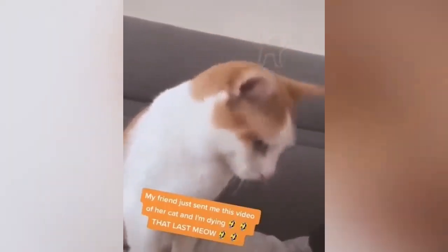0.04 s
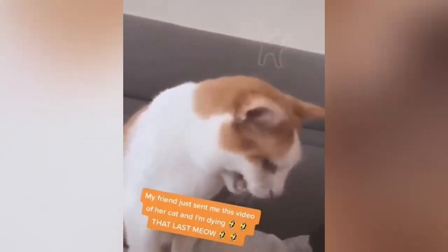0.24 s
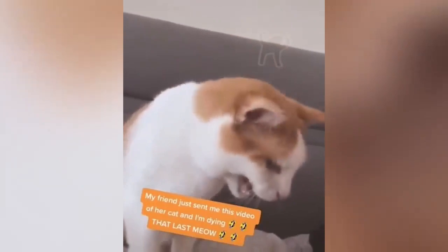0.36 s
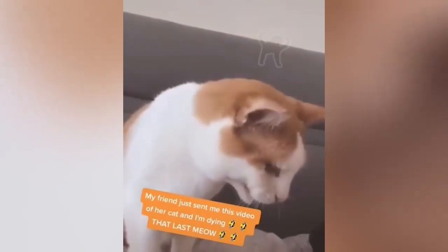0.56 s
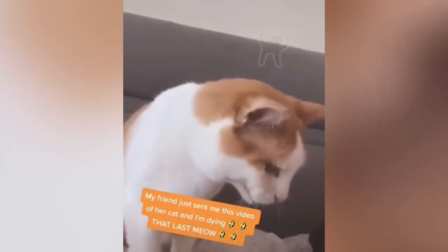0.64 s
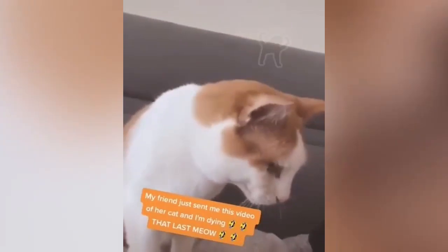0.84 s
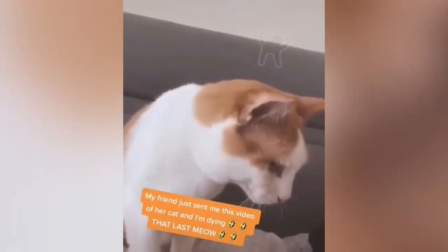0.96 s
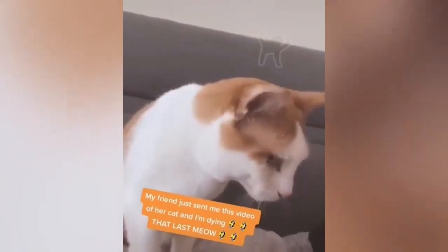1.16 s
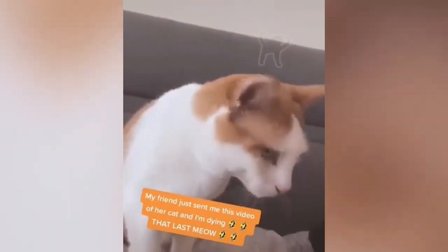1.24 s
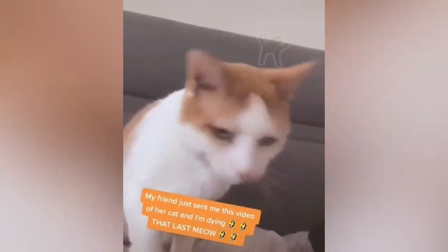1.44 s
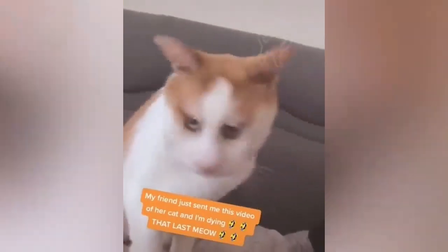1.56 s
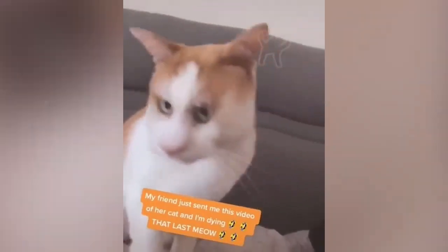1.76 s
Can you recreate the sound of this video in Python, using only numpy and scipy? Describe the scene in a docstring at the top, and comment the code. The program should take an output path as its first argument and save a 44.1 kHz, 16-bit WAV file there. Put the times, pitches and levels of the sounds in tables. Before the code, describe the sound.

Single close cat meow, bright then narrowing to a closed mouth, over faint indoor hum and rustle.

```python
"""A quiet furnished room, where a house cat gives one long, clear meow close to the microphone.
The voice is a stack of harmonics plus pulsing breath noise, shaped by throat and mouth resonances.
The mouth opens wide and slowly narrows, so the resonances sink, until the lips shut with a small
smack of two ringing tones. Ticks are resonant noise bursts and rustles are grainy noise; beneath
them lie a hum of wavering sines and the filtered noise of rumble and hiss."""
import sys
import numpy as np
from scipy import signal
from scipy.fft import rfft, irfft, next_fast_len
from scipy.io import wavfile
from scipy.ndimage import map_coordinates

SR = 44100
rng = np.random.default_rng(int(sys.argv[2]) if len(sys.argv) > 2 else 0)


def put_to_file(sound):
    """Save the sound as 16-bit audio at rate SR, in the file named by the first command-line argument."""
    columns = np.atleast_2d(sound).T  # one column per channel
    safe = np.clip(columns, -1, 1)
    whole_steps = np.round(safe * 32767)
    wavfile.write(sys.argv[1], SR, whole_steps.astype(np.int16))


N = 79380


def amp(db):
    """Decibels to gain."""
    return 10 ** (np.asarray(db) / 20)


def unit(x):
    """Scale to rms 1."""
    return x / np.sqrt(np.mean(x ** 2) + 1e-20)


def curves(rows, t):
    """Read each column after the time at times t, with straight lines between rows."""
    times, *columns = np.transpose(rows)
    return [np.interp(t, times, column) for column in columns]


def wobble(rate):
    """A smooth random curve through `rate` random knots a second."""
    knots = rng.standard_normal(N // 8)
    return map_coordinates(knots, [np.arange(N) * rate / SR + 4])


def filtered(x, response):
    """Pass x through a response given as a function of frequency."""
    m = next_fast_len(N + SR // 2)  # padded so that ringing does not wrap round
    return irfft(rfft(x, m) * response(np.fft.rfftfreq(m, 1 / SR)), m)[:N]


def noise(colour):
    """Noise of rms 1 whose spectrum follows a colour table on a log-frequency axis."""
    hz, db = np.transpose(colour)

    def response(f):
        return amp(np.interp(np.log(f + 1), np.log(hz + 1), db))

    return unit(filtered(rng.standard_normal(N), response))


def decay(age, t60):
    """Exponential decay that falls 60 dB in t60 seconds."""
    return np.exp(-np.log(1000) * age / t60)


# electrical hum partials: f/Hz, level/dB (rms)
HUM_PARTIALS = [(49.7, -43.5), (99.8, -57), (247, -63.5), (691, -71)]
HUM_WAVER_DB, HUM_WAVER_RAD = 0.5, 0.5


def hum(t, wavers_per_s=8):
    """Steady electrical partials, each wavering a little in level and phase."""
    out = np.zeros(N)
    for hz, db in HUM_PARTIALS:
        level = amp(db + HUM_WAVER_DB * wobble(wavers_per_s))
        phase = 2 * np.pi * hz * t + HUM_WAVER_RAD * wobble(wavers_per_s)
        out += level * np.sqrt(2) * np.sin(phase)
    return out


# spectrum of the room rumble: f/Hz, level/dB (relative)
RUMBLE_COLOUR = [(28, -29), (45, -6.5), (60, 5), (78, -15.5), (110, -12), (180, -13.5), (220, -23),
                 (320, -22), (560, -26.5), (2900, -36), (8400, -52), (12000, -68)]
RUMBLE_DB = -46  # rms


def rumble():
    """Low room tone: noise weighted heavily to the bass."""
    return amp(RUMBLE_DB) * noise(RUMBLE_COLOUR)


# spectrum of the hiss: f/Hz, level/dB (relative)
HISS_SPECTRUM = [(200, 9), (600, -5.5), (3000, -24), (7000, -14), (12000, -20)]
HISS_DB = -64  # rms


def hiss():
    """A faint, steady bed of coloured noise."""
    return amp(HISS_DB) * noise(HISS_SPECTRUM)


ECHO_T60_S, ECHO_DB = 0.12, -21
REFLECTION_S, REFLECTION_GAIN = 0.00088, 0.13  # off the sofa beside the cat


def echo(x, t):
    """A close reflection and the short, faint answer of a furnished room, as a decaying noise tail."""
    tail = rng.standard_normal(N) * decay(t, ECHO_T60_S)
    tail /= np.linalg.norm(tail)
    close = filtered(x, lambda f: REFLECTION_GAIN * np.exp(-2j * np.pi * f * REFLECTION_S))
    return close + amp(ECHO_DB) * signal.fftconvolve(x, tail)[:N]


# swells of the rustle: t/s, level/dB
RUSTLE_LEVEL = [(0, -50), (.04, -49.5), (.08, -54), (.14, -51), (.2, -51.5), (.46, -48.5), (.53, -58.5),
                (.86, -59.5), (.96, -54.5), (1.1, -56.5), (1.17, -54), (1.42, -60.5), (1.55, -57.5),
                (1.74, -58), (1.785, -45.5)]
# spectrum of the rustle: f/Hz, level/dB (relative)
RUSTLE_SPECTRUM = [(120, -61), (200, -10), (687, -9), (801, -11), (1270, -5.5), (2950, -6), (8820, -17),
                   (12000, -26), (15600, -47), (22000, -120)]


def rustle(t, grain_db=2.0, grains_per_s=300):
    """Soft rubbing of fur and fabric: coloured noise with a fast, grainy level."""
    grain = amp(grain_db * wobble(grains_per_s))
    return amp(curves(RUSTLE_LEVEL, t)[0]) * unit(noise(RUSTLE_SPECTRUM) * grain)


# small ticks of movement: t/s, level/dB (peak), f/Hz (centre)
MOVEMENT_TICKS = [(.112, -39, 4000), (.1295, -36, 2300), (.1408, -35, 6000), (0.462, -34, 5530),
                  (.776, -41, 2130), (.9483, -34, 3240), (0.9497, -30, 2730), (1.0187, -36.5, 2370),
                  (1.152, -40.5, 5800), (1.1593, -32.5, 2960), (1.34, -39, 2570), (1.5494, -36, 1740),
                  (1.640, -39, 3800), (1.722, -40, 1460)]
TICK_T60_S, TICK_Q = 0.0057, 1.25


def ticks(t):
    """Tiny dry cracks: bursts of a few milliseconds, each through a broad resonance applied twice."""
    out = np.zeros(N)
    for start, db, hz in MOVEMENT_TICKS:
        age = np.maximum(t - start, 0)
        burst = (t >= start) * rng.standard_normal(N) * decay(age, TICK_T60_S)

        def resonance(f):
            return 1j * f * hz / (hz ** 2 - f ** 2 + 1j * f * hz / TICK_Q)

        tick = filtered(burst, lambda f: resonance(f) ** 2)
        out += amp(db) * tick / np.abs(tick).max()
    return out


# lips shutting: t/s, f/Hz, level/dB (at onset, before decay), t60/s
LIP_RINGS = [(0.7502, 1590, -28, 0.0074), (0.754, 335, -33, 0.026)]


def smack(t):
    """The lips meet: the mouth cavity rings briefly, high and then low, as decaying sines."""
    out = np.zeros(N)
    for start, hz, db, t60 in LIP_RINGS:
        age = np.maximum(t - start, 0)
        out += amp(db) * decay(age, t60) * np.sin(2 * np.pi * hz * age)
    return out


# voice and mouth: t/s, level/dB, source tilt/dB per octave, first, second and third resonance f/Hz
MOUTH_SHAPE = [(0.215, -26.5, 2.5, 610, 2075, 3400), (0.27, -22.5, 3.0, 664, 2310, 3480),
               (0.32, -26, 3, 650, 2195, 3220), (0.385, -27, 3.5, 660, 2103, 3220),
               (0.44, -31.5, 0.95, 680, 2190, 3230), (0.52, -33.5, 6, 634, 1720, 2580),
               (0.58, -35.5, 4.5, 780, 1826, 2770), (0.66, -35.5, -4.4, 720, 1590, 2500),
               (0.7, -33.5, -0.5, 590, 1440, 2260), (0.74, -33.5, -9, 390, 1230, 2190.0)]
# widths of those three resonances: width/Hz
MOUTH_WIDTHS = [236, 186, 396]
# steady upper resonances: f/Hz, width/Hz
UPPER_THROAT = [(5104, 882), (6159, 644), (6688, 343)]
# antiresonances of side cavities, moving as the mouth closes: t/s, f/Hz, depth/dB (negative is a boost)
LOW_CAVITY = [(0.21, 1480, 6), (0.41, 1570, 15.5), (0.48, 2130, 9), (0.52, 2170, 16), (0.56, 2280, 5),
              (0.74, 2340, -11)]
HIGH_CAVITY = [(0.21, 5160, 4.6), (0.35, 5250, 5.5), (0.42, 4800, 34), (0.55, 4430, 26)]
# half widths of the low and high antiresonance: half width/Hz
CAVITY_HALF_WIDTHS = [113, 460]
VOICE_TOP_HZ = 7000  # steep top edge of the voice


def tract(f, t):
    """Throat and mouth at frequencies f and times t: resonances in series and two moving notches."""
    _, tilt_db, *centres = curves(MOUTH_SHAPE, t)
    h = amp(tilt_db * np.log2(f + 1)) / np.sqrt(1 + (f / VOICE_TOP_HZ) ** 40)
    for hz, width in list(zip(centres, MOUTH_WIDTHS)) + list(UPPER_THROAT):
        h = h * hz ** 2 / (hz ** 2 - f ** 2 + 1j * f * width)
    for cavity, half_width in zip((LOW_CAVITY, HIGH_CAVITY), CAVITY_HALF_WIDTHS):
        hz, depth_db = curves(cavity, t)
        h = h * amp(-depth_db / (1 + ((f - hz) / half_width) ** 2))
    return h


# vocal folds: t/s, f/Hz (pitch)
FOLD_PITCH = [(0.21, 477), (0.228, 468), (0.245, 478), (0.287, 488), (0.315, 478), (0.345, 480),
              (0.42, 497), (0.46, 512), (0.52, 526), (0.55, 542), (0.6, 540), (0.68, 519), (0.742, 491)]
# hoarseness: t/s, level/dB (turbulence against the voice)
HOARSENESS = [(.21, -24.5), (.25, -32), (.3, -35), (.33, -36), (.42, -45), (.455, -19), (.495, -26.5),
              (.55, -37), (.68, -35), (.75, -28)]
START_S, END_S, ATTACK_S, RELEASE_S = 0.2063, 0.7637, 0.0041, 0.025
# pitch jitter (fraction) and level shimmer; both grow with hoarseness
JITTER, SHIMMER_DB, FLUTTER_PER_S = 0.0029, 0.33, 150
# each harmonic wanders a little in level and has its own offset within the cycle
WANDER_DB, WANDER_PER_S, PHASE_SPREAD_RAD = 1.0, 40.73, 0.5
# when hoarse, the upper harmonics flutter more, each in its own way
GRIT, GRIT_PER_S, GRIT_FROM_HZ = 0.14, 300, 1400


def folds(t, on, pitch_phase, pitch, unsteady):
    """Sixteen harmonics of the vocal folds through the tract, levelled to a steady power."""
    k = np.arange(1, 17)[:, None]
    hz = k * pitch[on]
    wander = amp(WANDER_DB * np.array([wobble(WANDER_PER_S)[on] for _ in k]))
    offsets = np.exp(1j * PHASE_SPREAD_RAD * rng.standard_normal(k.shape))
    flutter = np.array([wobble(GRIT_PER_S)[on] + 1j * wobble(GRIT_PER_S)[on] for _ in k])
    grit = GRIT * unsteady[on] * flutter / (1 + (GRIT_FROM_HZ / hz) ** 2)
    h = tract(hz, t[on]) * wander * offsets * (1 + grit)
    harmonics = (h * np.exp(1j * k * pitch_phase[on])).real
    voice = np.zeros(N)
    voice[on] = np.sqrt(2) * harmonics.sum(0) / np.linalg.norm(h, axis=0)
    return voice * amp(SHIMMER_DB * unsteady * wobble(FLUTTER_PER_S))


def turbulence(pitch_phase):
    """Breath noise that pulses once per vocal cycle, coloured by the tract frame by frame."""
    pulsing = unit(rng.standard_normal(N) * (1 + np.cos(pitch_phase)))
    f, frames, z = signal.stft(pulsing, SR, nperseg=256)
    shape = np.abs(tract(f[:, None], frames))
    shape /= np.sqrt(np.mean(shape ** 2, axis=0))
    return signal.istft(z * shape, SR)[1][:N]


def meow(t):
    """Vocal fold harmonics and pulsing turbulence, both shaped by the closing mouth."""
    attack = np.clip((t - START_S) / ATTACK_S, 0, 1)
    release = np.clip((END_S - t) / RELEASE_S, 0, 1)
    gate = attack * release
    on = gate > 0
    rasp = amp(curves(HOARSENESS, t)[0])
    unsteady = rasp / rasp[on].mean()
    pitch = curves(FOLD_PITCH, t)[0] * (1 + JITTER * np.sqrt(unsteady) * wobble(FLUTTER_PER_S))
    pitch_phase = 2 * np.pi * np.cumsum(pitch) / SR
    voice = folds(t, on, pitch_phase, pitch, unsteady)
    air = turbulence(pitch_phase)
    return gate * amp(curves(MOUTH_SHAPE, t)[0]) * (voice + rasp * air)


def scene():
    """The cat and the ticks excite the room echo; rustle and background lie around them."""
    t = np.arange(N) / SR
    background = hum(t) + rumble() + hiss()
    near = ticks(t) + smack(t) + meow(t)
    return (background + rustle(t) + near + echo(near, t))[None]


TOP_HZ = 12100


def record(dry):
    """The recorder keeps nothing above its band limit."""
    return np.array([filtered(x, lambda f: f < TOP_HZ) for x in dry])


dry = scene()
out = record(dry)
put_to_file(out)
```